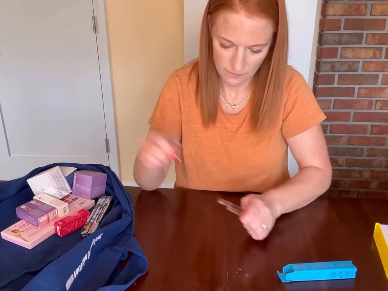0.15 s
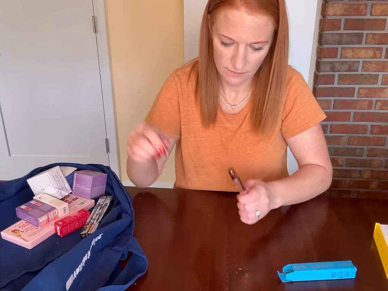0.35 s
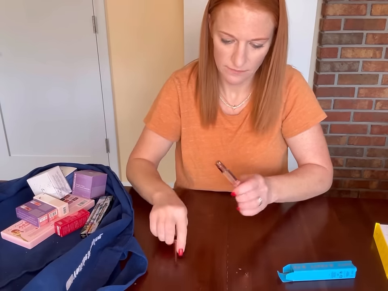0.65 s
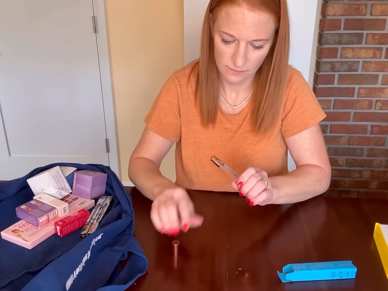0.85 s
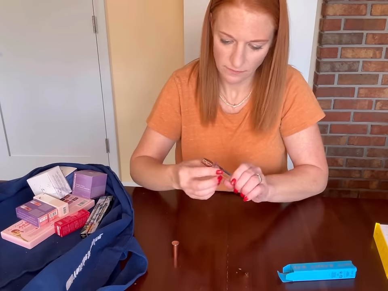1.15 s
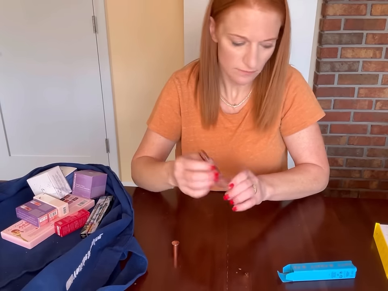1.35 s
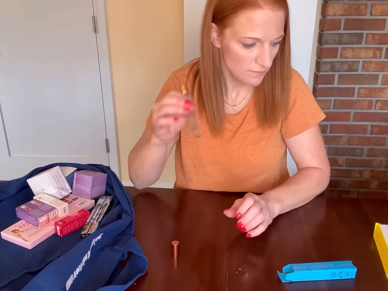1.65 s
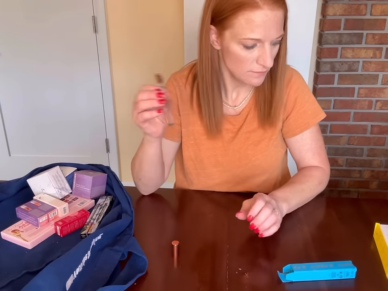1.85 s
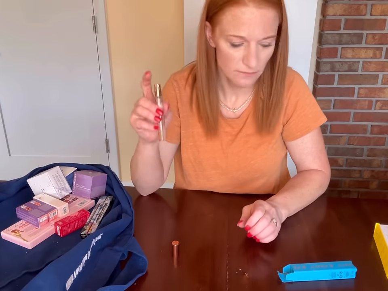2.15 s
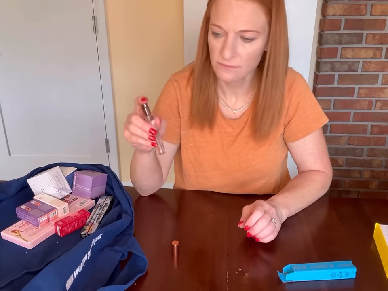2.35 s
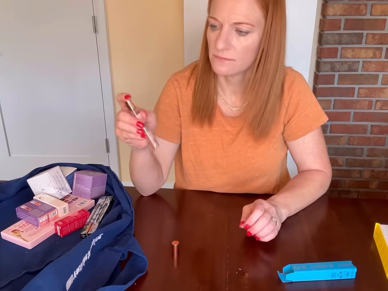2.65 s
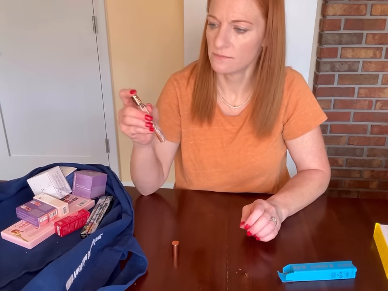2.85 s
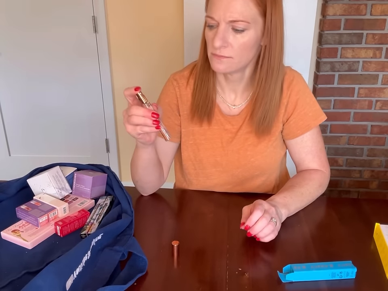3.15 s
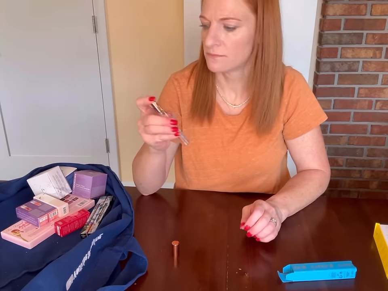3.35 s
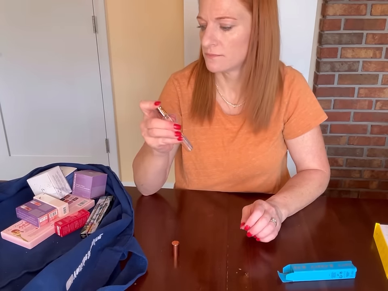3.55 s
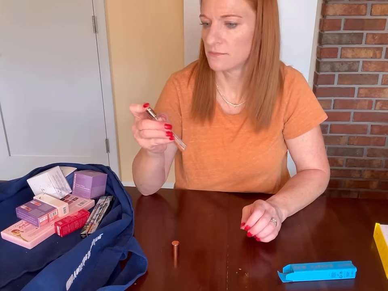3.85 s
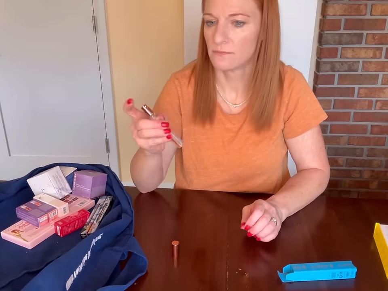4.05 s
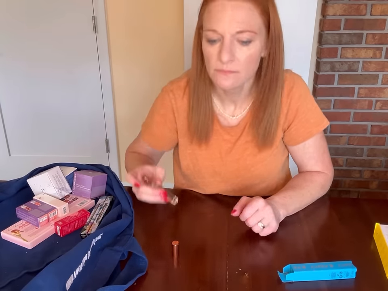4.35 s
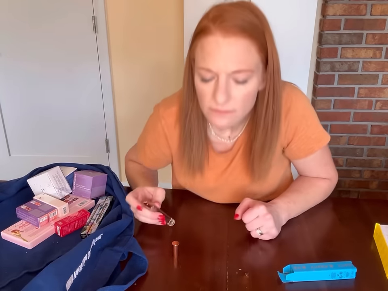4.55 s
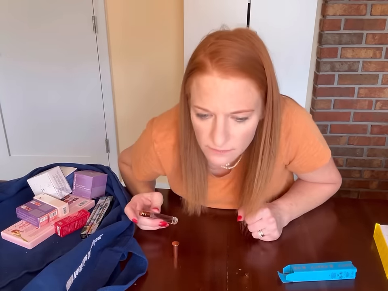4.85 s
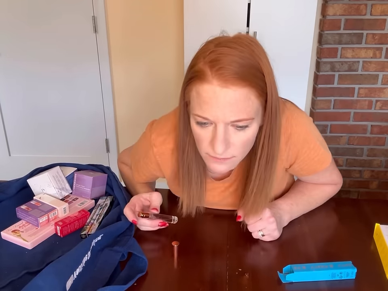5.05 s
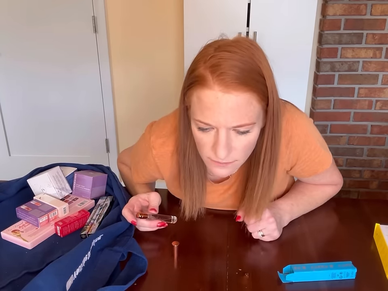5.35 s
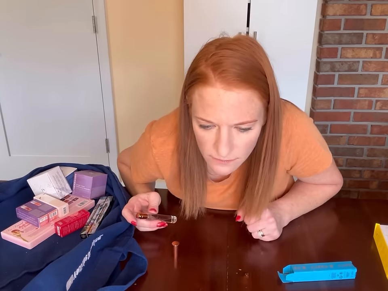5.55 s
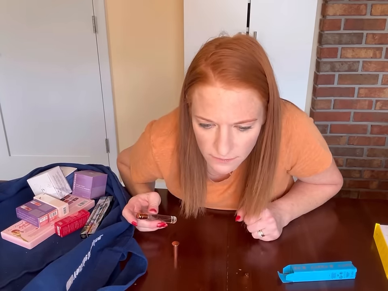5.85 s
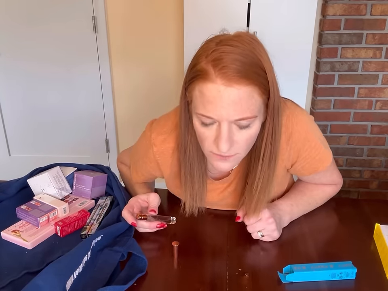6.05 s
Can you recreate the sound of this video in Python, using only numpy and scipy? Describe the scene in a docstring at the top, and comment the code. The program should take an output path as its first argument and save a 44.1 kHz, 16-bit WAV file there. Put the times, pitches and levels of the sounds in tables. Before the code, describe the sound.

In a quiet, lively room, a small cap clacks and rattles on a wooden table, a sprayer ticks and sputters, then glass knocks down hard.

```python
"""Perfume sprayer at a wooden table

A slim glass sprayer is handled in a quiet, lively room, over rumble, a swelling wash, hum and microphone hiss.
The cap scrapes off, lands, bounces and rattles; the pump ticks and sputters; elbows thud; the bottle is knocked down.
Contacts and puffs are short coloured noise bursts, ringing parts are damped sines, the beds are noise and sines.
Each contact or puff reaches two microphone ports directly, by early echoes and through a decaying room tail."""
import sys
import numpy as np
from scipy import signal
from scipy.fft import rfft, irfft, next_fast_len
from scipy.io import wavfile
from scipy.ndimage import uniform_filter1d, map_coordinates

SR = 44100
rng = np.random.default_rng(int(sys.argv[2]) if len(sys.argv) > 2 else 0)


def generate_wav(sig):
    """Save sig (samples, or channels by samples) to the path in sys.argv[1] as 16-bit PCM at SR."""
    pcm = np.round(np.clip(np.atleast_2d(sig).T, -1, 1) * 32767).astype(np.int16)
    wavfile.write(sys.argv[1], SR, pcm)


N = 272979

# colour of a hard click: pitch_hz, level_db (relative, per Hz)
CLICK_COLOUR = [(500, -26), (1400, -2.5), (3100, 4.5), (6000, -1.5), (9000, -9), (13000, -8.5),
                (14500, -22), (15500, -27)]
# ringing modes of the table top: pitch_hz, level_db (relative), t60_s
TABLE_MODES = [(143.5, -24.5, 0.32), (326, -18.5, 0.093), (439, -13.5, 0.12), (675, -25.5, 0.13),
               (875, -18, 0.08), (1420, 10, 0.0046), (1800, -7.5, 0.015), (4210, -17, 0.017),
               (5740, -29, 0.021)]
SNAP_S = .0006  # length of the bright dry snap of a hard edge


def amp(db):
    """Gain of a level in dB."""
    return 10 ** (np.asarray(db) / 20)


def unit(x):
    """Scaled to rms 1."""
    return x / np.sqrt(np.mean(x ** 2) + 1e-20)


def along(points, hz):
    """Values between (Hz, value) points, read on a log frequency axis."""
    f, v = np.transpose(points)
    return np.interp(np.log(hz + 1), np.log(f + 1), v)


def wobble(rate):
    """A smooth random curve with rate knots a second."""
    knots = rng.standard_normal(int(N * rate / SR) + 4)
    return map_coordinates(knots, [np.arange(N) * rate / SR])


def filtered(x, response):
    """x shaped by a response given as a function of frequency."""
    n = x.shape[-1]
    m = next_fast_len(n + 8192)  # spare room for the filter's tail
    return irfft(rfft(x, m) * response(np.fft.rfftfreq(m, 1 / SR)), m)[..., :n]


def causal(colour, tilt_db):
    """A colour, tilted in dB per octave above 1200 Hz, as a minimum-phase response that starts at the blow."""
    def response(hz):
        octaves = np.log2(np.maximum(hz, 1200) / 4000)
        db = np.maximum(along(colour, hz) + tilt_db * octaves, -90)
        # folding the cepstrum puts all the energy after the start
        cepstrum = irfft(np.log(amp(db)))
        cepstrum[1:len(hz) - 1] *= 2
        cepstrum[len(hz):] = 0
        return np.exp(rfft(cepstrum))
    return response


def ported(pair, colour):
    """Two unrelated noises, coloured and mixed so that the ports agree mainly in the bass."""
    # likeness of the two ports: pitch_hz, likeness (correlation)
    likeness = [(60, 0.94), (180, 0.72), (550, 0.15), (1650, 0.071), (4970, 0.01), (15000, 0.16)]

    def mid_side(hz):
        turn = np.arccos(np.clip(along(likeness, hz), -1, 1)) / 2
        return amp(along(colour, hz)) * [np.cos(turn), np.sin(turn)]

    mid, side = filtered(pair, mid_side)
    return np.array([mid + side, mid - side])


def rush(colour, patchy_db=0):
    """Steady stereo noise of rms 1, its gain varying in random patches of time and pitch."""
    z = signal.stft(rng.standard_normal((2, N + 512)), nperseg=512)[2]
    patches = uniform_filter1d(rng.standard_normal(z.shape[1:]), size=4, axis=0)  # across pitch
    patches = uniform_filter1d(patches, size=16, axis=1)  # across time
    pair = signal.istft(z * amp(patchy_db * unit(patches)), nperseg=512)[1][:, :N]
    return unit(ported(pair, colour))


def burst(length_s, response):
    """A contact or puff: fading uneven noise, with its smooth colour as heard from all sides."""
    u = np.arange(SR // 4) / SR / max(length_s, 1e-5)
    push = rng.standard_normal(len(u)) * np.exp(-u * u)
    spits_db = 3.4 * rng.standard_normal(len(u) // 16 + 1)
    push *= amp(np.repeat(spits_db, 16)[:len(u)])  # a new gain every 16 samples
    push[0] = 0.88  # sharp start
    x = filtered(np.array([push, u == 0]), response)
    x /= np.linalg.norm(x, axis=1)[:, None]
    return x * np.sqrt(1 / np.abs(x[1]).max() ** 2 + length_s * SR / 9)  # energy grows with length


def ring(modes):
    """Damped modes that start softly, at new strengths for each blow; alike from all sides."""
    t = np.arange(SR // 3) / SR
    x = np.zeros(len(t))
    for hz, db, t60 in modes:
        decay_db = db + rng.normal(0, 0.72) - 60 * t / t60
        x += amp(decay_db) * np.sin(2 * np.pi * hz * t)
    x *= 1 - np.exp(-t / .0003)
    return np.array([x, x])


def add(air, s, sound, wet_db, wall_db, pan_db, lag_s=0):
    """Places one sound in the room: direct, early echoes, and a tail that dies band by band."""
    # decay of the room: pitch_hz, t60_s
    room_decay = [(70, 0.2), (250, 0.47), (1000, 0.48), (4000, 0.49), (8000, .36), (14000, .25)]
    # early wall echoes: delay_s, level_db (relative)
    wall_echoes = [(.0045, -12.5), (.0092, -3.5), (.0125, -9), (.0195, -11), (.0255, -8), (.032, -11)]
    span = SR * 3 // 5
    direct, all_round = sound

    hz, t, z = signal.stft(rng.standard_normal((2, span)), SR, nperseg=256)
    decay = amp(-60 * t / along(room_decay, hz)[:, None])
    tail = signal.istft(z * decay, SR, nperseg=256)[1][:, :span]
    tail = ported(tail, [(20, 0)])
    tail *= 1 - np.exp(-np.arange(span) / SR / .004)  # the tail builds up
    tail *= amp(wet_db) / np.linalg.norm(tail[0])

    paths = np.zeros((2, span))
    for delay, db in wall_echoes:
        far_delay = delay * rng.uniform(.99, 1.01)
        paths[0, round(delay * SR)] = paths[1, round(far_delay * SR)] = amp(db + wall_db)
    paths = filtered(paths, lambda f: 1 / (1 + 1j * f / 5000))  # walls swallow the treble
    paths[0, 0] += amp(pan_db / 2)
    paths[1, round(max(lag_s, 0) * SR)] += amp(-pan_db / 2)  # the second port can hear it later

    wet = signal.fftconvolve(direct[None], paths, axes=1)
    wet = wet + signal.fftconvolve(all_round[None], tail, axes=1)
    start = round(s * SR)
    air[:, start:start + wet.shape[1]] += wet


def rumble():
    """Low noise through the walls, drifting slowly in level."""
    # level over time: time_s, level_db
    drift = [(0, -65), (0.5, -66), (0.8, -61), (2.2, -61.5), (2.9, -59.5), (3.5, -59.5), (4.7, -58),
             (6.19, -58)]
    # colour: pitch_hz, level_db (relative, per Hz)
    colour = [(20, -29.5), (32, -23.5), (42, 2), (54, 4), (75, -7.5), (102, -2.5), (140, -12), (175, -9),
              (205, -17.5), (330, -20.5), (500, -62.5)]
    level_db = np.interp(np.arange(N) / SR, *np.transpose(drift))
    level_db = level_db + 1.5 * wobble(2.5) + .9 * wobble(15)
    return amp(level_db) * rush(colour)


def distant_wash():
    """Slightly patchy mid-range noise that swells and sinks far away."""
    # level over time: time_s, level_db
    swell = [(0, -83), (1.6, -85), (2.1, -76), (3.0, -74.5), (3.4, -70.5), (3.8, -76), (4.4, -72),
             (5.2, -74), (5.6, -78), (6.19, -75)]
    # colour: pitch_hz, level_db (relative, per Hz)
    colour = [(180, -30.5), (300, -3.5), (487, -9), (565, -6), (624, -12.5), (717, -2.5), (975, -8.5),
              (1800, -8), (3200, -30.5), (4160, -57.5), (7040, -120)]
    level_db = np.interp(np.arange(N) / SR, *np.transpose(swell)) + 0.78 * wobble(4.2)
    return amp(level_db) * rush(colour, patchy_db=1.0)


def hum():
    """Appliance tones: sines wavering in level and phase."""
    # tones: pitch_hz, level_db (mean, rms)
    tones = [(237, -76), (457, -84), (4673, -105), (10293, -108)]
    t = np.arange(N) / SR
    total = np.zeros(N)
    for hz, db in tones:
        level = amp(db + 0.83 * wobble(4.1)) * np.sqrt(2)
        total += level * np.sin(2 * np.pi * hz * t + 0.69 * wobble(27))
    return total


def microphone_hiss():
    """Steady noise of the microphone."""
    # colour: pitch_hz, level_db (relative, per Hz)
    colour = [(150, -26), (250, -5.5), (460, -8), (800, -11), (1800, -26.5), (3200, -28.5), (7000, -36.5),
              (10400, -38), (13300, -45.5), (14200, -61), (15500, -58)]
    return amp(-71.5) * rush(colour)


def cap_pull(air):
    """The cap scrapes off the bottle in short noise bursts."""
    # scrapes: start_s, level_db, length_s
    scrapes = [(0.0512, -46, 0.002), (0.078, -46, 0.01), (0.0816, -40, 0.0036)]
    # colour: pitch_hz, level_db (relative, per Hz)
    colour = [(350, -38.5), (600, -6.5), (1030, -12), (1710, -2.5), (3420, -13), (5010, -3.5),
              (7740, -14.5), (13900, -11.5), (15500, -26)]
    for s, db, length_s in scrapes:
        scrape = amp(db) * burst(length_s, causal(colour, 0))
        add(air, s, scrape, wet_db=-2.5, wall_db=-5.0, pan_db=-1.5)


def arm_thuds(air):
    """Soft arms and hands push only the low end of the top, and its frame booms."""
    # contacts: start_s, level_db, length_s, dullness_hz, boom_db (relative to the contact)
    contacts = [(0.13, -47.5, 0.14, 150, -6.5), (1.368, -41, 0.017, 199, -11.5),
                (1.393, -41.5, 0.037, 196.5, 1), (2.411, -53, 0.034, 294, -12.5),
                (4.226, -48.5, 0.08, 199, -2.5)]
    # modes of the legs and frame: pitch_hz, level_db (relative), t60_s
    frame_modes = [(78, 0.5, .45), (109.5, 0.5, 0.3)]
    for s, db, length_s, dull_hz, boom_db in contacts:
        soft = [(20, -30), (90, 0), (dull_hz, -6), (4 * dull_hz, -36), (15000, -90)]
        thud = amp(db) * burst(length_s, causal(soft, 0))
        add(air, s, thud, wet_db=-5.5, wall_db=-17, pan_db=-2.5)
        add(air, s, amp(db + boom_db) * ring(frame_modes), wet_db=-9, wall_db=-16, pan_db=-2.5)


def cap_landing(air):
    """The cap strikes the table with a snap, then bounces; each blow cracks and rings it."""
    # first blow: start_s, level_db
    landing = (0.6193, -16)
    # colour of the crack: pitch_hz, level_db (relative, per Hz)
    colour = [(60, -35.5), (130, -9.5), (400, -11.5), (850, -7), (1600, -2), (2000, -3.5), (2400, 0),
              (2900, -7), (5000, -9), (7000, -20), (10300, -29), (13200, -43), (15000, -77)]
    # modes of the cap: pitch_hz, level_db (relative), t60_s
    modes = [(1616, -4, .04), (2346, -5.5, 0.075), (2505, -4, .05), (3990, -9, 0.026)]
    flight_s, bounce_db, loss_db = .0225, -31.5, 4  # time between blows, first bounce, loss a bounce

    s, db = landing
    snap = amp(db - 9.5) * burst(SNAP_S, causal(CLICK_COLOUR, -1.5))
    add(air, s, snap, wet_db=-12.5, wall_db=-12.5, pan_db=-5.5, lag_s=.00004)
    add(air, s, amp(db - 21.5) * ring(TABLE_MODES), wet_db=-1.5, wall_db=-6, pan_db=4.0)  # the top answers

    blows = [(s, db, -9)]  # start_s, level_db, ring_db against the crack
    for k in range(3):
        blows.append((s + flight_s * (k + 1), bounce_db - loss_db * k, -1))
    for at, level_db, ring_db in blows:
        crack = amp(level_db) * burst(0.0014, causal(colour, 2.1))
        add(air, at, crack, wet_db=1.5, wall_db=-12.5, pan_db=-6)
        add(air, at, amp(level_db + ring_db) * ring(modes), wet_db=-2.0, wall_db=-14.0, pan_db=-2)


def cap_rattle(air):
    """The cap rocks to rest, its rim chattering in three weakening contacts each time."""
    # rocks: start_s, level_db (first contact)
    rocks = [(0.729, -38), (0.763, -36), (0.976, -60)]
    # colour: pitch_hz, level_db (relative, per Hz)
    colour = [(100, -29), (400, -2.5), (1500, -3.5), (3200, -4.5), (5000, -5.5), (6500, -14),
              (10000, -28.5), (14000, -43)]
    gap_s, scatter, loss_db = 0.0076, 0.51, 1  # mean gap, scatter as a share of it, loss a contact
    for s, db in rocks:
        for k in range(3):
            at = s + gap_s * (k + scatter * rng.uniform(-1, 1) * (k > 0))
            contact = amp(db - loss_db * k) * burst(0.0024, causal(colour, 0))
            add(air, at, contact, wet_db=1.5, wall_db=0.0, pan_db=-3.0)


def dull_ticks(air):
    """Small dull ticks and creaks, each a single damped mode."""
    # ticks: start_s, level_db, pitch_hz, t60_s
    creaks = [(1.692, -52.5, 1367, 0.017), (5.105, -61.5, 759, 0.061), (5.99, -62, 1148, 0.03),
              (6.1, -62.5, 730, 0.17), (6.14, -62, 756, 0.079)]
    for s, db, hz, t60 in creaks:
        add(air, s, amp(db) * ring([(hz, 0, t60)]), wet_db=-6.5, wall_db=-2.5, pan_db=-9.0)


def pump_ticks(air):
    """The pump head clicks and sets its tube and the glass ringing."""
    # ticks: start_s, level_db, brightness_db (per octave), tube_db, glass_db (rings relative to the click)
    ticks = [(2.4084, -41.5, 3, -21.5, -11.5), (2.416, -54, -6, -30, -42.5), (2.648, -54.5, -3, -2.5, -23),
             (2.690, -65.5, -8, -0.5, -11), (2.700, -67, -5, -5, -29), (2.706, -63.5, 3, -15, -40),
             (2.777, -67.5, -9.5, -8, -40), (2.789, -67.5, 3, -3, -40), (2.859, -51, 7.5, -16, -37),
             (3.054, -67, 6.5, -2, -39.5), (3.44, -71, -9, -5, -42), (3.995, -64, -9, -9.5, -46),
             (4.897, -62, 12.5, -34, -43)]
    # modes of the tube: pitch_hz, level_db (relative), t60_s
    tube_modes = [(3900, 0, .018), (5900, -3, .018)]
    # modes of the glass: pitch_hz, level_db (relative), t60_s
    glass_modes = [(5850, -8, 0.24), (5920, 3, 0.087), (5740, -12, .18), (6060, -16, 0.13)]
    for s, db, bright_db, tube_db, glass_db in ticks:
        click = amp(db) * burst(0.0021, causal(CLICK_COLOUR, bright_db))
        add(air, s, click, wet_db=-5, wall_db=-9, pan_db=-4)
        ringing = amp(tube_db) * ring(tube_modes) + amp(glass_db) * ring(glass_modes)
        add(air, s, amp(db) * ringing, wet_db=-13, wall_db=-8, pan_db=0.0)


def spray_puffs(air):
    """Each pump stroke spits twice from the nozzle; the second spit is softer and brighter."""
    # strokes: start_s, level_db, brightness_db (per octave), spit_s, gap_s (to the second spit)
    strokes = [(2.562, -50, 12, .006, .006), (3.581, -51.5, -3, .0035, .020),
               (3.764, -44, -1.5, 0.0055, .012), (3.813, -45.5, 0.5, .008, 0.013),
               (3.851, -48, 10.5, .004, .005), (3.916, -63, 10, .004, .004)]
    # colour: pitch_hz, level_db (relative, per Hz)
    colour = [(900, -36), (1700, -12.5), (2800, -6), (6000, -3), (8000, -9), (11500, -8.5), (14200, -11),
              (15600, -16)]
    for s, db, bright_db, length_s, gap_s in strokes:
        for at, level_db, tilt_db in [(s, db, bright_db), (s + gap_s, db - 2.5, bright_db + 8)]:
            spit = amp(level_db) * burst(length_s, causal(colour, tilt_db))
            add(air, at, spit, wet_db=-7, wall_db=-11, pan_db=-2.4, lag_s=.00009)


def bottle_knock(air):
    """The hard glass bottle hits the table: a snap, a crack and the ring of the whole top."""
    # blow: start_s, level_db
    blow = (4.598, -17)
    # colour of the crack: pitch_hz, level_db (relative, per Hz)
    colour = [(40, -52), (75, -37), (125, -9), (310, -5), (440, -3), (650, -3.5), (900, -6), (1420, -9.5),
              (2300, -6), (3100, -23), (4300, -30), (5800, -31.5), (8800, -37.5), (13400, -50.5),
              (15000, -83)]
    s, db = blow
    snap = amp(db - 6) * burst(SNAP_S, causal(CLICK_COLOUR, -4))
    add(air, s, snap, wet_db=-12, wall_db=-7, pan_db=-4)
    crack = amp(db) * burst(.00005, causal(colour, .3))
    add(air, s, crack, wet_db=10.5, wall_db=2.5, pan_db=4.5)
    add(air, s, amp(db + 6.5) * ring(TABLE_MODES), wet_db=-4.5, wall_db=-2.5, pan_db=-1.2)


def finger_rustle(air):
    """Fingers shift on the bottle: short bursts with the treble tilted down."""
    # rustles: start_s, level_db
    rustles = [(5.976, -65), (6.044, -65.5)]
    for s, db in rustles:
        rustle = amp(db) * burst(0.0094, causal(CLICK_COLOUR, -7))
        add(air, s, rustle, wet_db=1.5, wall_db=-11, pan_db=-8.0)


def scene():
    """Everything that reaches the two microphone ports."""
    background = rumble() + distant_wash() + hum() + microphone_hiss()
    background *= amp([[-.6], [.6]])  # a little louder in the second port
    air = np.zeros((2, N + 2 * SR))  # room for the last tails
    for source in (cap_pull, arm_thuds, cap_landing, cap_rattle, dull_ticks,
                   pump_ticks, spray_puffs, bottle_knock, finger_rustle):
        source(air)
    return air[:, :N] + background


def record(dry):
    """The microphone drops the deepest bass; nothing is kept above the band limit."""
    corner_hz, top_hz = 32, 15700

    def response(hz):
        ratio = hz / corner_hz
        bass_cut = (1j * ratio) ** 2 / (1 + 1.4j * ratio - ratio ** 2)
        return bass_cut * (hz < top_hz)

    return filtered(dry, response)


dry = scene()
out = record(dry)
generate_wav(out)
```